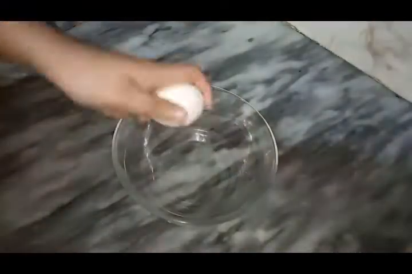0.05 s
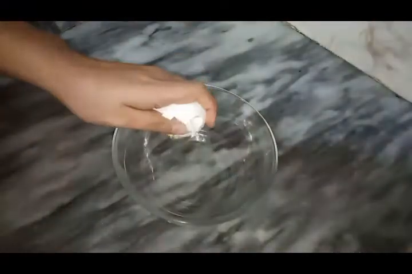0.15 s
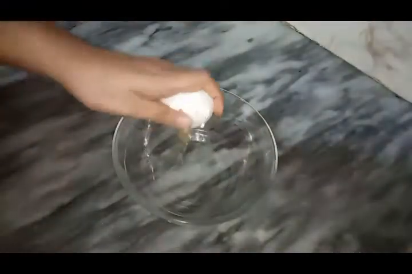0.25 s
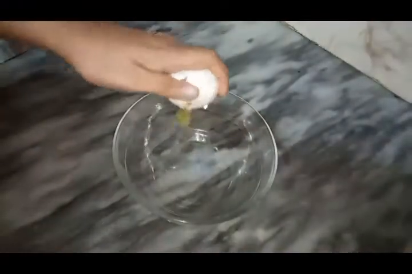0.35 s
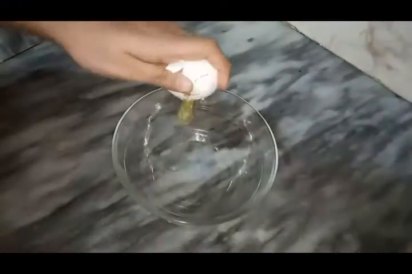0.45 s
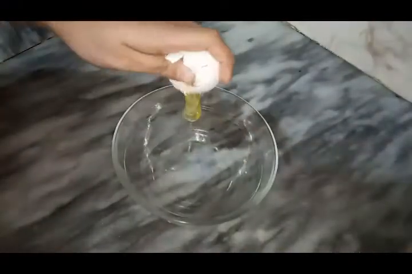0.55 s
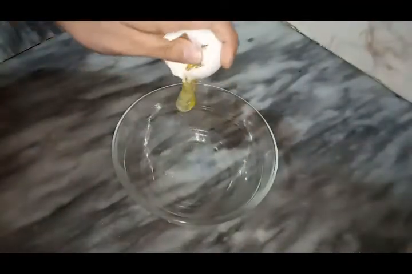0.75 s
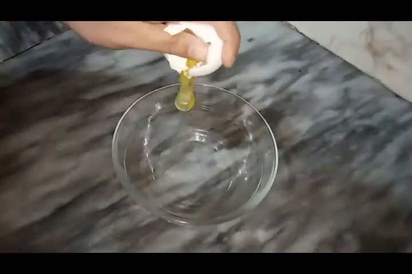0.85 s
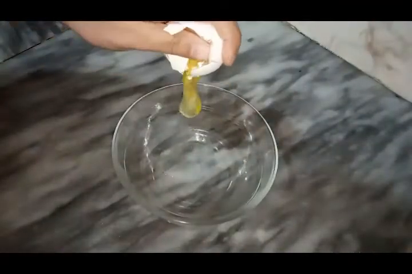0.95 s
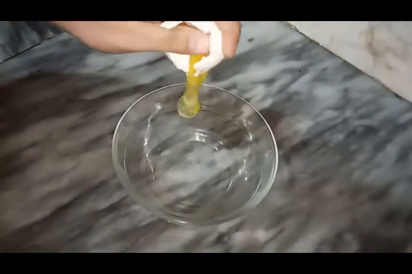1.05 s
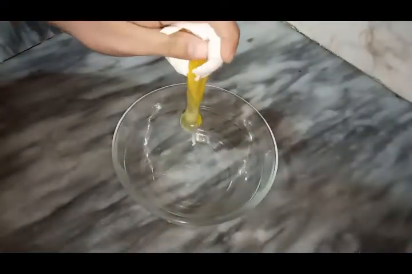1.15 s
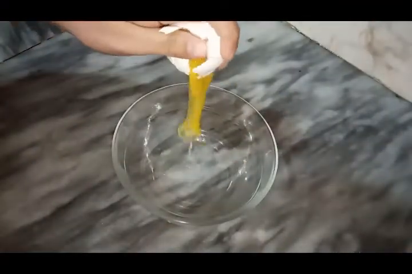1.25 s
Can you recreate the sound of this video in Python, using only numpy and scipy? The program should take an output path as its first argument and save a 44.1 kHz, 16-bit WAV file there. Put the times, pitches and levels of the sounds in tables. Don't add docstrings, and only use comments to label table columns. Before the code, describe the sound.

An egg is cracked open over a glass bowl with crisp shell crunches and wet squelchy creaks

```python
import sys
import numpy as np
from scipy import signal
from scipy.fft import rfft, irfft, next_fast_len
from scipy.io import wavfile
from scipy.ndimage import map_coordinates

SR = 44100
rng = np.random.default_rng(int(sys.argv[2]) if len(sys.argv) > 2 else 0)


def file_out(sig):
    cols = np.atleast_2d(sig).T
    lim = np.clip(cols, -1, 1)
    pcm = np.round(lim * 32767).astype(np.int16)
    wavfile.write(sys.argv[1], SR, pcm)


def gain_from_db(level_db):
    decades = np.asarray(level_db, float) / 20
    return 10 ** decades


N = 57330
TIME = np.arange(N) / SR


def unit(x):
    return x / np.sqrt(np.mean(x ** 2) + 1e-20)


def along(points, hz):
    f, v = np.transpose(points)
    return np.interp(np.log(hz + 1), np.log(f + 1), v)


def filtered(x, response):
    m = next_fast_len(len(x) + 8192)
    return irfft(rfft(x, m) * response(np.fft.rfftfreq(m, 1 / SR)), m)[:len(x)]


def causal(points):
    def response(hz):
        cepstrum = irfft(np.log(gain_from_db(along(points, hz))))
        half = len(cepstrum) // 2
        cepstrum[1:half] *= 2
        cepstrum[half + 1:] = 0
        return np.exp(rfft(cepstrum))
    return response


def resonance(hz, centre_hz, width_hz):
    return 1j * hz * width_hz / (centre_hz ** 2 - hz ** 2 + 1j * hz * width_hz)


def without_lows(x, corner_hz):
    return filtered(x, lambda f: (1j * f / (corner_hz + 1j * f)) ** 2)


def coloured_noise(points):
    return unit(filtered(rng.standard_normal(N), lambda f: gain_from_db(along(points, f))))


def swell(s, rise, fall, hold=0):
    ms = (TIME - s) * 1000
    return gain_from_db(np.minimum(0, 20 * np.minimum(ms / rise, (hold - ms) / fall)))


def wobble(rate):
    knots = rng.standard_normal(int(N * rate / SR) + 4)
    return map_coordinates(knots, [np.arange(N) * rate / SR])


# (frequency [Hz], level [dB per Hz])
AIR = [(120, -24), (200, -3.5), (500, -9.5), (1100, -11.5), (3800, -16), (5000, -28.5), (7500, -20.5),
       (10000, -31), (15800, -31.5)]
# (frequency [Hz], level [dB per Hz])
DRONE = [(12, -50), (25, -30), (45, -22), (80, -13.5), (108, -4.5), (127, 4.5), (146, -1), (180, -15),
         (230, -30), (400, -90)]


def background():
    air = gain_from_db(-65.5 + 1.27 * wobble(13.24)) * coloured_noise(AIR)
    drone = gain_from_db(-62 + 0.71 * wobble(6.7)) * coloured_noise(DRONE)
    return air + drone


# (frequency [Hz], t60 [s])
ROOM_DECAY = [(500, 0.24), (3000, 0.27), (8000, 0.16), (14000, 0.069)]


def kitchen(x):
    hz, t, z = signal.stft(rng.standard_normal(SR // 3), SR, nperseg=128)
    decay = gain_from_db(-60 * t / along(ROOM_DECAY, hz)[:, None])
    tail = signal.istft(z / abs(z) * decay, SR, nperseg=128)[1]
    delayed = np.pad(x, (60, 0))
    return signal.fftconvolve(delayed, tail / np.linalg.norm(tail))[:N]


# (frequency [Hz], level [dB], t60 [s])
RIM_MODES = [(6500, -75, .09), (6950, -70, .1), (7983, -61, .13), (9711, -68, .14), (11165, -72, .07),
             (14293, -76, .12)]


def rim():
    ring = np.zeros(N)
    for hz, db, t60 in RIM_MODES:
        level = gain_from_db(db - 60 * TIME / t60 + 2.74 * wobble(97))
        ring += level * np.sin(2 * np.pi * (hz * TIME + rng.random()))
    echo = unit(filtered(rng.standard_normal(N), lambda f: gain_from_db(along(SHELL, f)) / (1 + (f / 8000) ** 4)))
    return ring + gain_from_db(-62 - 60 * TIME / 0.14) * echo


# (time [s], level [dB rms], rise [ms per 20 dB], fall [ms per 20 dB])
SQUASHES = [
    (0.1653, -46.5, 26, 68),
    (0.52, -80, 10, 15),
    (0.33, -69.5, 4.1, 81),
    (.904, -62, 10, 30),
    (0.42, -80, 11, 27),
]
# (frequency [Hz], level [dB])
SQUASH_TONE = [(170, -13), (295, -8.5), (440, -8), (610, -11), (850, -3.5), (1200, -44)]


def squash():
    push = sum(gain_from_db(db) * swell(s, rise, fall) for s, db, rise, fall in SQUASHES)
    return coloured_noise(SQUASH_TONE) * push


# (time [s], level [dB rms], rise [ms per 20 dB], fall [ms per 20 dB], pitch [Hz])
FILMS = [(0.163, -48.5, 19, 23, 840), (0.186, -52, 18, 61, 615), (.18, -58, 7.8, 22, 350),
         (.899, -41.5, 12, 19, 1990), (0.95, -48, 9.1, 32, 1900), (.761, -52, 5, 37, 1800),
         (.615, -49, 12, 25, 1600), (1.182, -65.5, 9, 18, 1200), (.914, -44.5, 23, 28, 2080)]


def films():
    out = np.zeros(N)
    for s, db, rise, fall, hz in FILMS:
        level = gain_from_db(db + 3.5 + 3 * wobble(150)) * swell(s, rise, fall)
        pitch = hz * (1 + 0.04 * wobble(120))
        out += level * np.sin(2 * np.pi * np.cumsum(pitch) / SR)
    return out


def fractures():
    per_s, spread_db, blur, clump_db = 8000, 3, 0.79, 1.05
    clicks = (rng.random(N) < per_s / SR) * rng.choice([-1, 1], N)
    clicks = clicks * gain_from_db(spread_db * rng.standard_normal(N))
    grains = unit(clicks) + blur * rng.standard_normal(N)
    return unit(grains * gain_from_db(clump_db * wobble(350)))


# (time [s], level [dB rms], rise [ms per 20 dB], fall [ms per 20 dB], pitch [Hz])
CREAKS = [(0.171, -39.5, 22.4, 13, 3760), (0.222, -39, 1.75, 7.5, 3010), (0.489, -49.5, 7.9, 41, 1117),
          (.514, -61.5, 54, 21, 1550), (0.589, -42.5, 8.1, 39, 2560), (0.598, -40, 22, 45, 1145),
          (0.604, -38.5, 22, 44, 1614), (1.1137, -48.5, 2, 7.8, 1174), (0.706, -44.5, 31, 49, 1250),
          (.705, -44.5, 31, 57, 1640), (0.757, -41, 1.8, 29, 1125), (0.762, -44, 13, 49, 2100),
          (0.786, -45, 3.2, 17, 3780), (0.84, -46, 10.5, 22, 2210), (0.844, -45, 6, 28, 3400),
          (0.88, -45, 5.2, 33, 1083), (0.901, -43, 11, 22, 1090), (0.905, -44, 41, 41, 1990),
          (0.959, -45, 5, 11, 1224), (0.3652, -47, 1.1, 23, 1128), (1.029, -62.5, 27, 44, 1840),
          (1.058, -62.5, 46, 32, 3480), (1.088, -49, 1.5, 6.9, 1220), (1.153, -61.5, 23, 21, 3680)]


def creaks():
    grit = fractures()
    width = 0.14
    out = np.zeros(N)
    for s, db, rise, fall, hz in CREAKS:
        rub = 8 * gain_from_db(db) * swell(s, rise, fall) * grit
        out += filtered(rub, lambda f: resonance(f, hz, width * hz) * resonance(f, hz, 3 * width * hz))
    return out


# (time [s], peak level [dB], pitch [Hz], t60 [s])
PINGS = [(0.2208, -31, 2990, 0.013), (0.3633, -29.5, 1590, 0.0074), (0.3645, -48, 1018, 0.013),
         (0.3338, -52, 1560, 0.017), (.6025, -22, 2560, .006), (.6025, -26, 3500, .005),
         (.8408, -40, 4040, 0.019), (.846, -29.5, 2320, 0.013), (.846, -38, 3600, 0.0067),
         (0.877, -45, 1070, .04), (0.9581, -39.5, 1810, 0.017), (1.087, -49.5, 1247, .03),
         (1.087, -52.5, 3770, 0.037), (1.1125, -43.5, 1198, 0.027), (1.1132, -47.5, 1960, 0.018),
         (1.1135, -46, 3560, 0.016), (1.1493, -50.5, 1410, 0.015), (1.149, -56, 3730, .02),
         (1.1555, -48, 2200, 0.012), (1.155, -49, 3960, 0.019), (1.165, -54, 1160, 0.022),
         (1.2466, -52, 1070, .025), (1.2474, -56.5, 1960, .02)]


def pings():
    out, t = np.zeros(N + SR), np.arange(4096) / SR
    for s, db, hz, t60 in PINGS:
        out[round(s * SR):][:len(t)] += gain_from_db(db - 60 * t / t60) * np.sin(2 * np.pi * hz * t)
    return without_lows(out[:N], 500)


# (time [s], peak level [dB], width [samples])
BREAKS = [(.143, -26, 4.5), (0.159, -30, 3), (.1612, -20, 4.4), (0.1654, -14, 3.3), (0.1692, -33, 6),
          (0.1695, -26, 4), (.1752, -35, 4.7), (0.1944, -28, 4.5), (0.201, -32, 4), (.2074, -33, 2.9),
          (0.2198, -42, 6.5), (0.226, -33, 4), (0.361, -33, 3.1), (0.3636, -13, 4.8), (0.586, -33, 4),
          (0.6025, -11, 7), (0.7441, -21, 5.4), (0.7576, -32, 8), (0.784, -21, 6.4), (0.8465, -18.5, 7.4),
          (0.891, -27, 4.4), (.899, -36, 4.9), (.9042, -21, 5.6), (1.087, -44, 5), (1.115, -43, 7.6),
          (1.1555, -49, 4.4), (1.2456, -61, 3.9)]


def breaks():
    out, sample = np.zeros(N + SR), np.arange(2048)
    for s, db, width in BREAKS:
        phase = np.clip((sample + 1) / (width + 1), 0, 1)
        out[round(s * SR):][:len(sample)] += gain_from_db(db) * np.sin(np.pi * phase) ** 2
    return filtered(2 * out[:N], causal(SHELL))


# (time [s], peak level [dB], hollow ring [dB], hollow pitch [Hz], length [s per 20 dB])
EARLY_SNAPS = [(.1115, -44, -6, 1030, 0.0065), (.1425, -32, -2.5, 3530, 0.0095),
               (.1925, -18, -22, 3450, 0.0075), (.2065, -21, -33, 3120, 0.0059),
               (.2245, -28, -18, 2950, 0.0059), (.2705, -32, -0.5, 1220, 0.0077),
               (.3345, -42.5, 7, 3570, 0.0038), (.3415, -39.5, 1, 3470, 0.0033),
               (.3626, -16.5, -13, 4230, 0.0065), (.4575, -41, -12, 1030, 0.0083),
               (.4843, -41, 2, 1060, 0.0094), (.5255, -34.5, -1, 1610, 0.0071),
               (.5565, -34.5, 4.5, 1100, 0.0075), (.6022, -17, -7, 3030, 0.014)]
# (time [s], peak level [dB], hollow ring [dB], hollow pitch [Hz], length [s per 20 dB])
LATE_SNAPS = [(.6925, -41, 14, 1530, 0.0095), (.7366, -42.5, 17, 1920, 0.0077),
              (.7418, -30.5, 9, 1940, 0.0073), (.7575, -32, 6, 1840, 0.0074),
              (.7615, -28.5, 5.5, 2020, 0.0068), (.7835, -22.5, 6.5, 2040, 0.0058),
              (.8002, -32, -17, 2300, 0.0072), (.8406, -48, 2, 3900, .005),
              (.8455, -24.5, -10, 2410, 0.0055), (.8768, -32.5, -8, 2060, 0.0071),
              (.9572, -29.5, 1.5, 1760, 0.0085), (.9925, -39, 0, 1970, 0.0052),
              (1.0395, -44, -7, 3530, .005), (1.0866, -44, -4.5, 3600, 0.0072),
              (1.1124, -33.5, 0, 2050, 0.0077), (1.1355, -54, -5, 4040, 0.005),
              (1.1546, -47, -3, 3700, 0.0043), (1.2463, -45, -10, 1070, 0.0068),
              (1.2805, -51, -2, 1950, 0.0049)]


def snaps():
    rise_s, ring_width = 0.0012, 0.16
    dry, rung, t = np.zeros(N + SR), np.zeros(N + SR), np.arange(2048) / SR
    for s, db, ring_db, hz, length in list(EARLY_SNAPS) + list(LATE_SNAPS):
        start = round(s * SR)
        envelope = gain_from_db(-20 * t / length) * (1 - np.exp(-t / rise_s))
        burst = 0.45 * rng.standard_normal(len(t)) * envelope
        ring = filtered(burst, lambda f: resonance(f, hz, ring_width * hz))
        dry[start:][:len(t)] += gain_from_db(db) * burst
        rung[start:][:len(t)] += 4 * gain_from_db(db + ring_db) * ring
    return filtered(2 * dry[:N], causal(SHELL)) + without_lows(rung[:N], 600)


# (start of peak [s], level [dB rms], rise [ms per 20 dB], hold [ms], fall [ms per 20 dB])
TEARS = [(.116, -64.5, 0, 14, 20), (0.149, -44, 3, 11, 33), (0.162, -26, 13.5, 12.8, 19.5),
         (.195, -41, 3, 10.6, 37), (0.274, -58.5, 27, 19, 38), (.337, -72, 10, 8.2, 20),
         (0.36, -39, 14.5, 3.5, 23), (0.458, -55.5, 8, 5.6, 18), (.488, -53, 10.5, 18, 58),
         (.579, -48, 4, 5.3, 7), (0.588, -30.5, 8, 9.9, 12), (.597, -38, 4, 5, 9),
         (0.608, -35, 16, 5.6, 25), (.641, -56.5, 23, 24, 28), (0.704, -47.5, 8, 6.6, 41),
         (.791, -42, 37, 7.2, 15), (.816, -60.5, 24, 42, 34), (0.887, -51.5, 19, 7.3, 10),
         (0.898, -35.5, 13, 9, 27.5), (.931, -59, 18, 41, 38), (.993, -67, 2, 4.1, 15),
         (1.041, -60, 42, 17.5, 30.5), (1.136, -62.5, 13, 12, 20), (1.153, -60.5, 12, 12, 14)]
# (frequency [Hz], level [dB])
SHELL = [(310, -56), (920, -21.5), (2600, -10), (4900, -11.5), (9700, -15), (13400, -11), (15100, -10),
         (15900, -39)]


def tearing():
    force = sum(gain_from_db(db) * swell(s, rise, fall, hold) for s, db, rise, hold, fall in TEARS)
    return filtered(2 * force * fractures(), causal(SHELL))


def microphone_port(x):
    def response(f):
        port = gain_from_db(13) * resonance(f, 7380, 850)
        seam = gain_from_db(0.5) * resonance(f, 6880, 470)
        return 1 + port + seam
    return filtered(x, response)


def scene():
    egg = tearing() + creaks() + snaps() + breaks() + pings()
    egg = egg + gain_from_db(-12.5) * kitchen(egg)
    return (microphone_port(egg) + squash() + rim() + background() + films())[None]


def low_pass(x):
    return signal.sosfilt(signal.butter(12, 16510, fs=SR, output="sos"), x)


def record(dry):
    top_hz, top_db = 15750, -38
    mix = filtered(dry[0], lambda f: np.where(f < top_hz, 1, gain_from_db(top_db)))[None]
    return low_pass(mix)


dry = scene()
out = record(dry)
file_out(out)
```